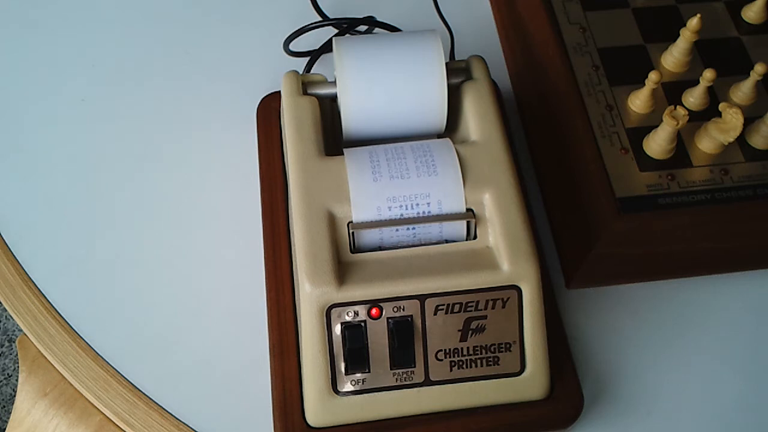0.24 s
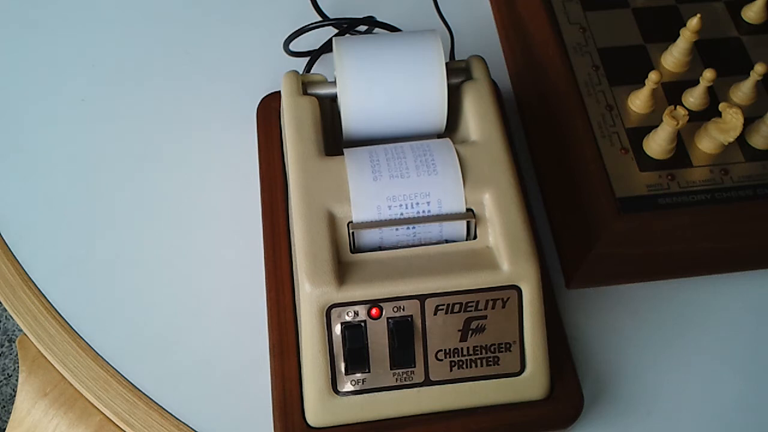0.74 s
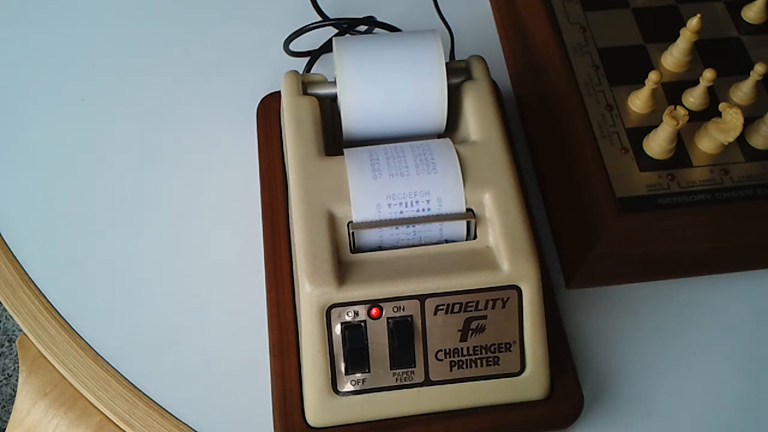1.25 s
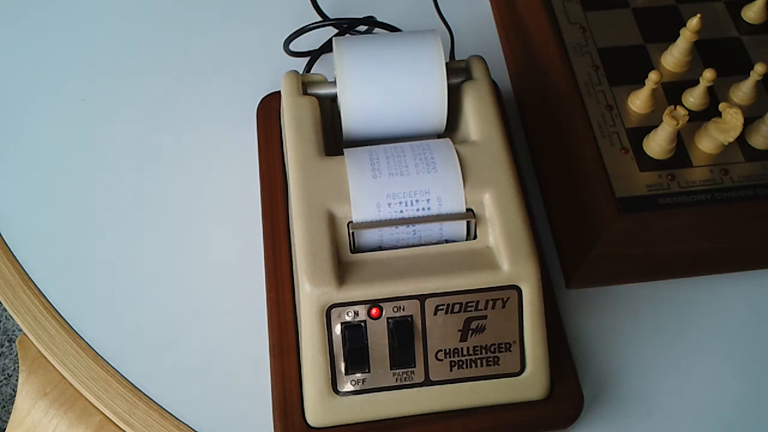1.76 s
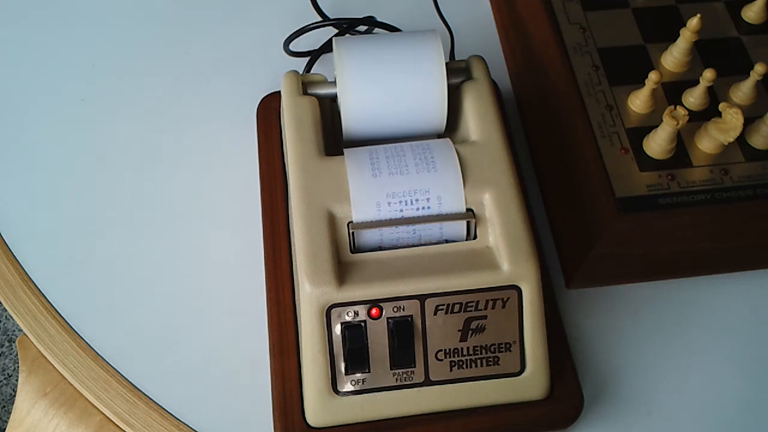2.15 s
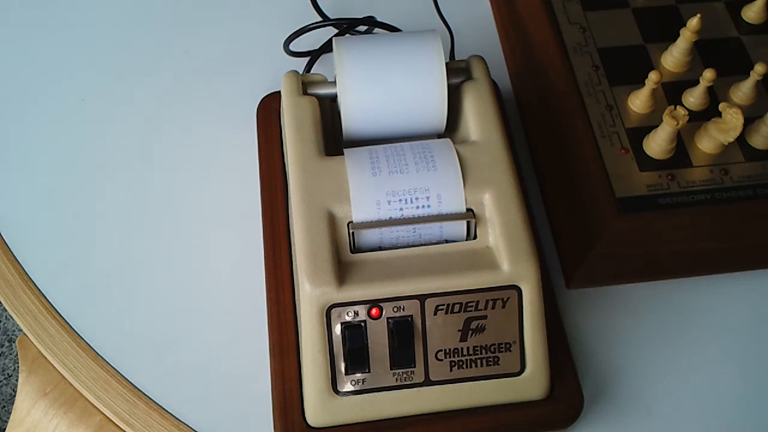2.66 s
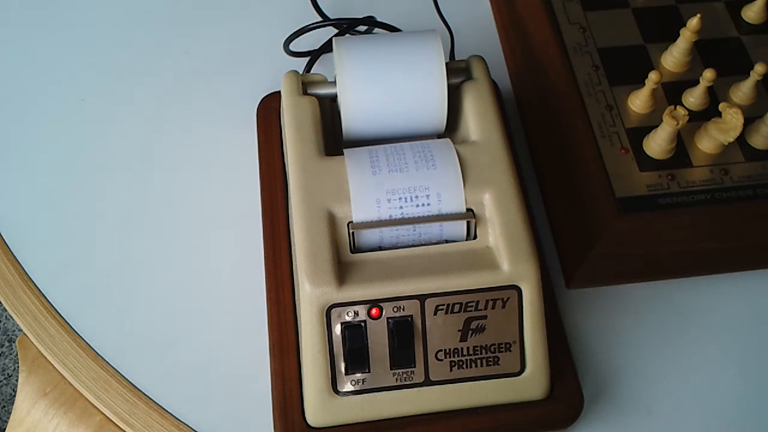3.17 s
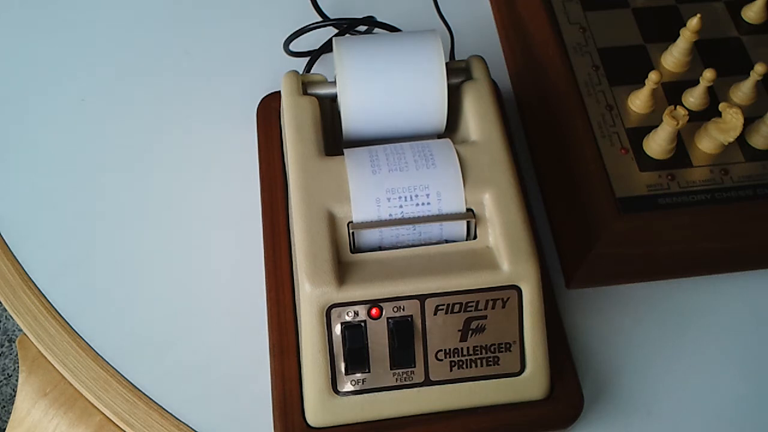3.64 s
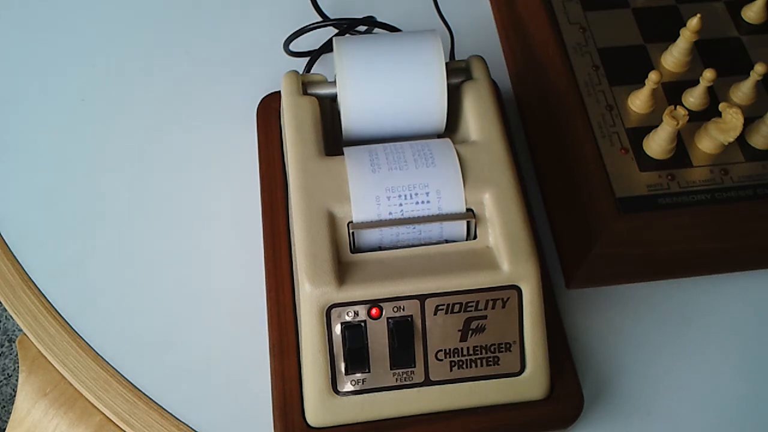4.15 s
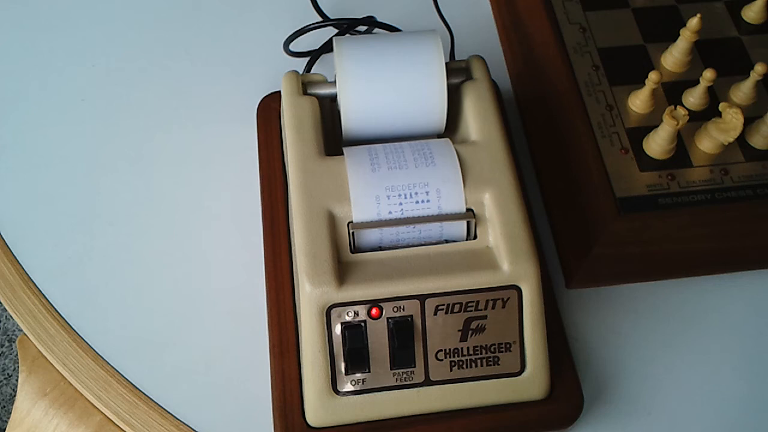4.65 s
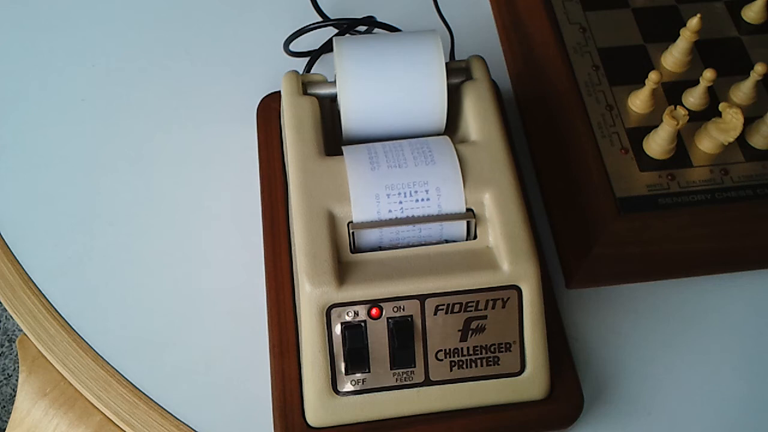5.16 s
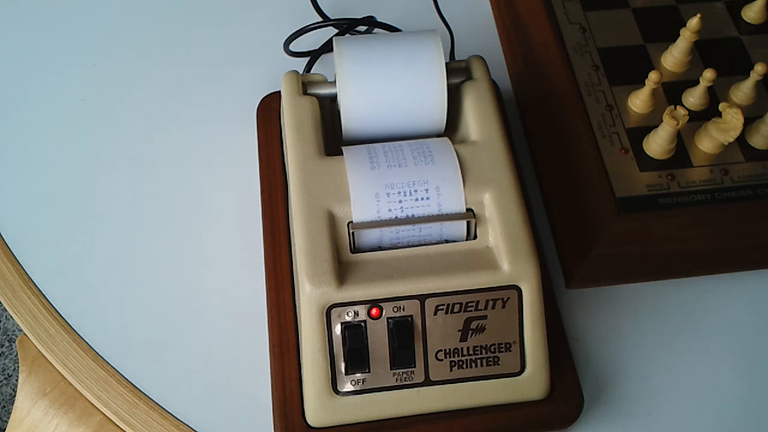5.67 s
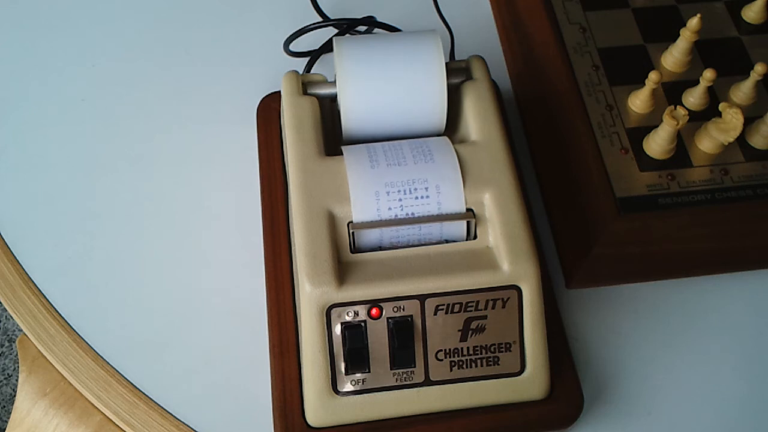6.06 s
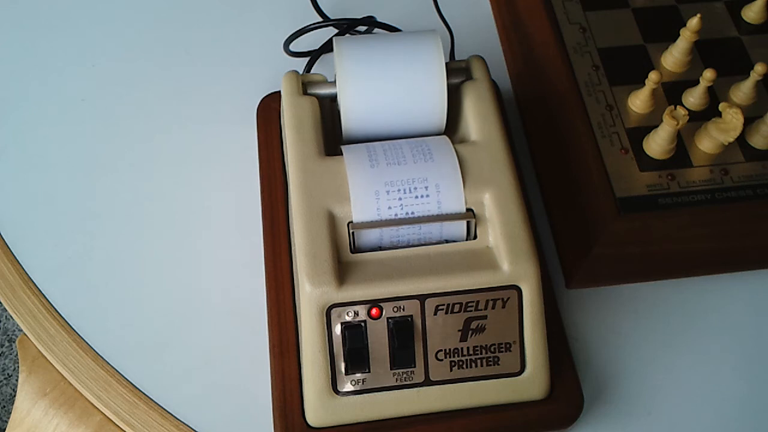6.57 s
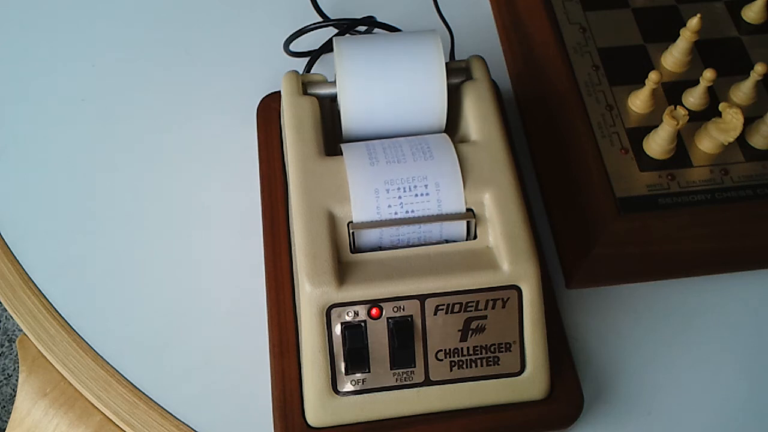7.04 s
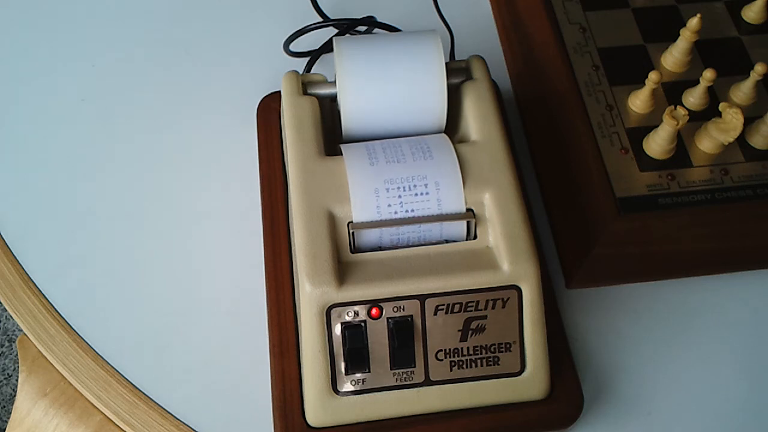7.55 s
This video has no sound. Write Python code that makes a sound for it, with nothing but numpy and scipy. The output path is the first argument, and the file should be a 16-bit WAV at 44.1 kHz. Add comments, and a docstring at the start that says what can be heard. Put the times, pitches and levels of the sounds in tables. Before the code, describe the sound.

A small thermal printer on a table advances its paper line by line with sharp clacks, about three a second. Each is a metallic snap with a brief hollow ring from the plastic case. The clacks come in three runs separated by short pauses and vary a little in strength. The microphone is close, in a small room, with light hiss and the faint drone of far traffic outside.

```python
"""Sharp, ringing clacks, about three a second: a small plastic thermal printer steps its paper on,
line by line, on a table near the microphone. At each step a solenoid slams its pawl against the stop,
the hollow case rings and the small room answers. Far traffic drones in through the window, over the
hiss of the single microphone."""
import sys
import numpy as np
from scipy import signal
from scipy.io import wavfile

SR = 44100
rng = np.random.default_rng(int(sys.argv[2]) if len(sys.argv) > 2 else 0)


def dump_mix(stems):
    """Bounce the given channels to the path in sys.argv[1] as a 16-bit WAV at rate SR."""
    frames = np.atleast_2d(stems).T  # one column per channel
    limited = np.clip(frames, -1, 1)  # hard clip at full scale
    pcm = np.round(limited * 32767).astype(np.int16)
    wavfile.write(sys.argv[1], SR, pcm)


N = 344414

# solenoid strokes: (time [s], blow [dB], landing on the pawl [0 dull, 1 bright], case walls [dB],
# crack [dB], buzz pitch [Hz], buzz [dB])
STROKES = [(0.0476, -39.5, 0.73, -43, -27.5, 502, -42), (0.1134, -50.5, .2, -51.5, -37.5, 496, -43.5),
           (0.639, -39, 0.5, -52, -26.5, 502, -50), (0.9858, -39, 0.21, -47, -29, 496, -41),
           (1.3309, -37, .6, -46.5, -25.5, 505, -39.5), (1.7073, -32, 1.3, -38.5, -15, 487.6, -37),
           (2.0512, -34.5, 0.68, -36, -22, 508, -45), (2.3975, -31, 1.14, -35.5, -19, 495, -36.5),
           (2.6487, -37, 0.48, -49.5, -23.5, 498, -42), (2.8726, -48, .4, -47, -38, 490.7, -42),
           (2.9377, -48, 0.42, -52, -38, 494, -40), (3.5223, -42.5, 0.52, -42.5, -33, 498, -41),
           (3.8696, -34.5, 0.4, -42, -22, 494, -53.5), (4.2152, -33.5, 0.96, -39, -20, 512, -46.5),
           (4.592, -30, 0.73, -35.5, -16, 488, -37.5), (4.9349, -34.5, 0.81, -43, -22.5, 505, -42.5),
           (5.2782, -36, 0.57, -41.5, -24.5, 512, -43), (5.6218, -35, 0.48, -39.5, -20.5, 500, -45.5),
           (5.8907, -30, 0.8, -40.5, -17.5, 480, -68), (5.9546, -54, .45, -49, -42, 500, -43.5),
           (6.5399, -29.5, 0.89, -39, -17, 487, -38.5), (6.8524, -31.5, 0.58, -42, -17.5, 492, -50),
           (7.1657, -34, .65, -41.5, -20, 477, -45), (7.4798, -33, 0.49, -43, -19, 497, -37),
           (7.7913, -35.5, 0.65, -43.5, -20.5, 494, -48)]
THIN_WALLS_DB = -11   # the three highest wall modes, relative to the blow


def printer():
    """The printer close up: pawl, case and spring. So small a body radiates no bass."""
    return signal.sosfilt(signal.butter(4, 270, "high", fs=SR, output="sos"), pawl() + case() + buzz())


def pawl():
    """Steel cracks against the stop, loose parts rattle, and nearby surfaces throw the sound back."""
    # modes of pawl and stop in three groups, low to high: (pitch [Hz], level [dB], t60 [s], signed gain)
    groups = [
        [(2480, -19, 0.0071, 0.23), (3260, -2, 0.0052, 0.64)],
        [(4200, -21, 0.011, 0.89), (4720, -1.5, 0.0017, 0.64)],
        [(5370, -2, 0.0037, 0.57), (6380, -2.5, 0.0035, 0.68)],
    ]
    # small ticks as the pawl takes up its slack or drops back: (time [s], level [dB])
    ticks = [(0.13, -49), (2.393, -45), (2.875, -42), (2.940, -43), (3.55, -46), (3.867, -47), (4.208, -42),
             (4.586, -43), (4.931, -39), (5.617, -46), (5.886, -47), (6.849, -39), (7.162, -37.5),
             (7.473, -44), (7.785, -45.5)]
    # reflections off the table and nearest walls: (delay [s], level [dB])
    echoes = [(.00068, 3.5), (.0082, -15.5), (0.0162, -24.5)]
    landing_loss_db, rattle_db, rattle_t60_s = 39.5, -37, 0.015
    s, _, landing, _, crack_db = np.transpose(STROKES)[:5]
    # a group rings less the farther the blow lands from its own spot
    crack = sum(strike(s + .0004, crack_db - landing_loss_db * (landing - spot) ** 2, group, 2.23)
                for spot, group in zip(np.linspace(0, 1, len(groups)), groups))
    steel = sum(groups, [])
    crack += strike(*np.transpose(ticks), steel, spread_db=0.5)
    # the rattle is dying noise that shakes the same steel
    jolts = clicks(s + 0.0012, from_db(crack_db + rattle_db))
    chatter = die_away(jolts, rattle_t60_s) * rng.standard_normal(N)
    crack += sum(from_db(db) * ring(chatter, hz, t60) for hz, db, t60, _ in steel)
    out = crack.copy()
    for lag_s, db in echoes:
        lag = round(lag_s * SR)
        out[lag:] += from_db(db) * crack[:-lag]
    return out


def case():
    """Each blow rings the plastic walls and, about 2 ms later, the air inside them."""
    # wall modes: (pitch [Hz])
    wall_hz = [760, 860, 1000, 1075, 1305, 1435, 1850]
    # ring of the walls at those pitches: (level [dB], t60 [s], signed gain)
    wall_ring = [(-9, 0.039, 0.74), (-13.5, 0.031, -0.16), (-3.5, 0.057, 0.57), (-1, 0.064, -0.84),
                 (-9, 0.019, -0.12), (10, 0.038, -0.69), (-2, 0.0086, -1.5)]
    # modes of the enclosed air: (pitch [Hz], level [dB], t60 [s], signed gain)
    air_modes = [(320.4, -1.5, 0.18, 0.19), (424.7, -5, 0.21, -0.41), (470, -13, 0.062, 0.31),
                 (608, 2.5, 0.087, -0.24)]
    s, blow_db, _, wall_db = np.transpose(STROKES)[:4]
    wall_modes = [(hz, *mode) for hz, mode in zip(wall_hz, wall_ring)]
    low_walls = strike(s + 0.00088, wall_db, wall_modes[:4], spread_db=4.5)
    thin_walls = strike(s + 0.000924, blow_db + THIN_WALLS_DB, wall_modes[4:], spread_db=2.5)
    hollow = strike(s + 0.00297, hollow_level(wall_db), air_modes, spread_db=4.0)
    return low_walls + thin_walls + hollow


def hollow_level(wall_db):
    """Level in dB of the air in the case, which varies less from stroke to stroke than the walls."""
    usual_hollow_db, usual_wall_db = -39.5, -41
    return usual_hollow_db + 0.42 * (wall_db - usual_wall_db)


def buzz():
    """The armature spring sings while the coil holds it; once it is damped only a weak ring is left."""
    coil_on_s = .018
    out, t = np.zeros(N + SR), np.arange(SR // 4) / SR
    onset = np.clip((t - .0035) / 0.0015, 0, 1)
    held = from_db(-120 * t - 7400 * np.maximum(t - coil_on_s, 0))
    weak_ring = from_db(-8.0 - 222 * t)
    for s, *_, hz, db in STROKES:
        at = round(s * SR)
        out[at:at + len(t)] += from_db(db) * onset * (held + weak_ring) * np.sin(2 * np.pi * hz * t)
    return out[:N]


def table_thump():
    """The table top takes the recoil: a soft push sets its lowest mode swinging."""
    recoil = clicks(np.array(STROKES)[:, 0], from_db(-65))
    push = signal.sosfilt(signal.butter(2, 200, fs=SR, output="sos"), recoil)
    return ring(push, hz=124, t60=0.29)


def room():
    """The small room answers each stroke: reflections build up quickly and die band by band."""
    # reverberation time: (frequency [Hz], t60 [s])
    decay = [(250, 1), (600, 0.76), (1500, 0.35), (3500, 0.46), (6500, 0.44)]
    # colour of the reflections: (frequency [Hz], level [dB])
    colour = [(250, -19.5), (400, 2), (600, -11), (1000, -2.5), (1500, -2.5), (2500, -9.5), (4200, -4.5),
              (6500, -8)]
    s, blow_db, _, wall_db = np.transpose(STROKES)[:4]
    out, rise = 0, np.exp(-1 / (0.00046 * SR))
    lumps = from_db(2.0 * drift(160.0))   # short sounds keep single reflections apart
    for hz, band in noise_bands()[10:]:
        if hz < 700:   # each band is fed by the part that rings there
            feed_db = hollow_level(wall_db) - 7.5
        elif hz < 1200:
            feed_db = wall_db
        else:
            feed_db = blow_db + THIN_WALLS_DB * (hz < 1900)
        onsets = signal.lfilter([1 - rise], [1, -rise], clicks(s + 0.0029, from_db(feed_db)))
        early = from_db(1.5) * die_away(onsets, t60=0.1)   # the nearest surfaces answer louder
        tail = die_away(onsets, at_hz(decay, hz))
        out += from_db(at_hz(colour, hz)) * (early + tail) * rms_one(band) * (lumps if hz > 1900 else 1)
    return out


def hum():
    """One unsteady low tone swells and fades behind the printer."""
    # swells: (time of peak [s], pitch [Hz], level [dB], fade to either side [dB/s])
    swells = [(2.48, 268, -57.5, 129), (3.0, 273.4, -62.5, 56), (4.8, 264, -74, 85),
              (5.4, 264.4, -77, 24.5), (6.4, 260, -68.5, 63), (6.97, 261.7, -55, 200),
              (7.6, 267.4, -62, 120)]
    t = np.arange(N) / SR
    wavering_t = np.cumsum(1 + 0.011 * drift(4.4)) / SR
    tone = sum(from_db(db - fade * np.abs(t - s)) * np.sin(2 * np.pi * hz * wavering_t)
               for s, hz, db, fade in swells)
    return np.sqrt(2) * from_db(1.7 * drift(22.0)) * tone


def engine():
    """An engine passes outside; low orders of its firing rate waver on the way through walls and glass."""
    # the pass, heard from indoors: (time [s], firing rate [Hz], level [dB])
    passing = [(0, 71.7, -74), (1.7, 72.2, -68.5), (2.1, 74.25, -70), (2.6, 81.05, -68.5),
               (3.3, 84.4, -66.5), (4.3, 82.2, -72.5), (4.9, 80.2, -71.5), (5.8, 79.9, -74.5),
               (6.6, 79.1, -70), (7.1, 76.4, -77.5), (7.81, 76.8, -79)]
    # engine orders: (multiple of the firing rate, level [dB])
    orders = [(1, -20), (2, -12.5), (3, -5), (3.5, -11)]
    hz, level_db = in_time(passing)
    phase = 2 * np.pi * np.cumsum(hz * (1 + 0.0044 * drift(2.73))) / SR
    drone = sum(from_db(db + 4.5 * drift(2.5)) * np.sin(k * phase + k * k) for k, db in orders)
    return np.sqrt(2) * from_db(level_db) * drone


def traffic_and_hiss():
    """Deep bass and far traffic rumble swell in patches under the smooth hiss of the microphone."""
    # course of the background: (time [s], traffic rumble [dB], hiss [dB])
    levels = [(0.0, -61, -67), (0.59, -62, -67), (2.96, -60, -65.5), (4.96, -62, -66), (5.61, -62, -66),
              (7.81, -65.5, -67.5)]
    # spectrum of the bass: (frequency [Hz], relative density [dB])
    low = [(25, -13), (36, -14), (50, -1.5), (64, -12), (86, -3), (113, 2)]
    # spectrum of rumble and hiss: (frequency [Hz], relative density [dB])
    upper = [(65, -53), (110, -17), (135, -14), (216, -9.5), (261, -9.5), (344, -7), (375, -19),
             (394, -12.5), (461, -4.5), (538, -14), (814, -10), (4190, -19.5), (6800, -22), (8840, -52.5),
             (15000, -120)]
    rumble_db, hiss_db = in_time(levels)
    bands = [(hz, band * from_db(at_hz(low if hz < 120 else upper, hz))) for hz, band in noise_bands()]
    bass = sum(band * from_db(3.3 * drift(2.0)) for hz, band in bands if hz < 120)
    rumble = sum(band * from_db(0.86 * drift(4.0)) for hz, band in bands if 120 <= hz < 2200)
    hiss = sum(band for hz, band in bands if hz >= 2200)
    return (from_db(-82.5) * rms_one(bass) + from_db(rumble_db) * rms_one(rumble)
            + from_db(hiss_db) * rms_one(hiss))


def strike(s, level_db, modes, spread_db):
    """Every blow sets all modes ringing, each with a randomly varied share."""
    shares = spread_db * rng.standard_normal((len(s), len(modes)))
    return sum(gain * ring(clicks(s, from_db(level_db + db + share)), hz, t60)
               for (hz, db, t60, gain), share in zip(modes, shares.T))


def clicks(s, gains):
    """One sample of the given height at each time."""
    out = np.full(N, 1e-18)
    np.add.at(out, np.round(np.asarray(s) * SR).astype(int), gains)
    return out


def ring(x, hz, t60):
    """One mode: a unit click starts a dying sine of height 1."""
    r, w = from_db(-60 / (t60 * SR)), 2 * np.pi * hz / SR
    return signal.lfilter([0, np.sin(w)], [1, -2 * r * np.cos(w), r * r], x)


def die_away(x, t60):
    """Give each click a tail that falls 60 dB in t60 seconds."""
    return signal.lfilter([1], [1, -from_db(-60 / (t60 * SR))], x)


def noise_bands():
    """Third-octave bands of noise with their centres; neighbours are unrelated."""
    edges, white = 22 * 2 ** (np.arange(27) / 3), rng.standard_normal((2, N))
    return [(np.sqrt(lo * hi),
             signal.sosfilt(signal.butter(2, [lo, hi], "band", fs=SR, output="sos"), white[k % 2]))
            for k, (lo, hi) in enumerate(zip(edges, edges[1:]))]


def drift(rate_hz):
    """Slow noise of spread 1, drawn at every 40th sample."""
    r = np.exp(-80 * np.pi * rate_hz / SR)
    slow = signal.lfilter([1], [1, -2 * r, r * r], rng.standard_normal(N // 40 + 2002))[2000:]
    return np.interp(np.arange(N) / 40, np.arange(len(slow)), rms_one(slow))


def in_time(rows):
    """Columns of a curve table at every sample."""
    s, *columns = np.transpose(rows)
    return [np.interp(np.arange(N) / SR, s, column) for column in columns]


def at_hz(points, hz):
    """Read a curve on a log-frequency axis."""
    frequencies, values = np.transpose(points)
    return np.interp(np.log(hz), np.log(frequencies), values)


def from_db(db):
    """Decibels to gain."""
    return 10 ** (np.asarray(db) / 20)


def rms_one(x):
    """Scale to unit rms."""
    return x / np.sqrt(np.mean(x ** 2) + 1e-20)


def scene():
    """One microphone near the printer feeds both channels."""
    mono = printer() + from_db(-18) * room() + traffic_and_hiss() + engine() + hum() + table_thump()
    return np.array([mono, mono])


def record(dry):
    """The recorder cuts the treble steeply above 6870 Hz."""
    return signal.sosfilt(signal.ellip(14, .3, 75, 6870, fs=SR, output="sos"), dry)


dry = scene()
out = record(dry)
dump_mix(out)
```